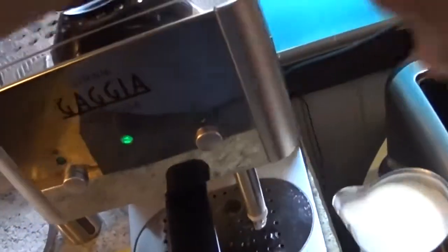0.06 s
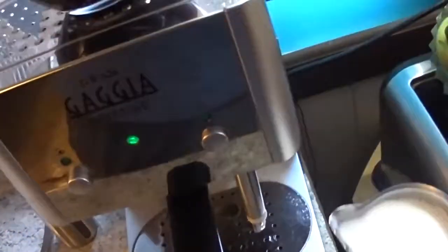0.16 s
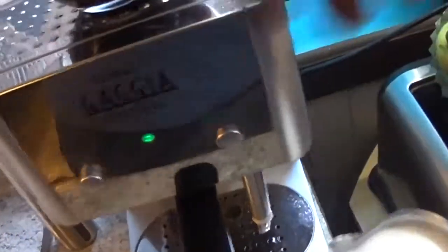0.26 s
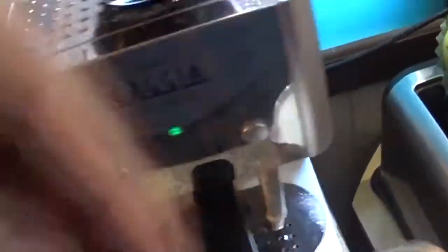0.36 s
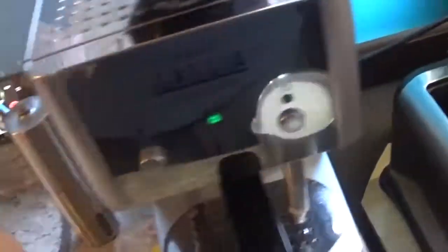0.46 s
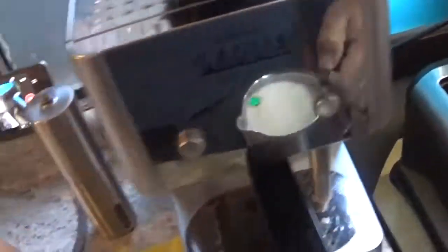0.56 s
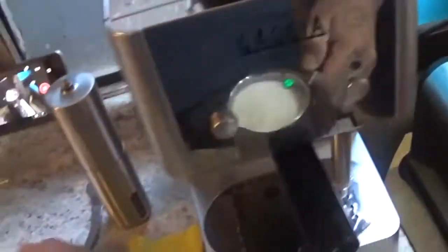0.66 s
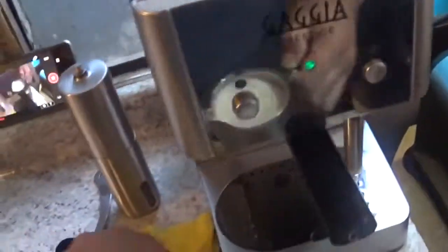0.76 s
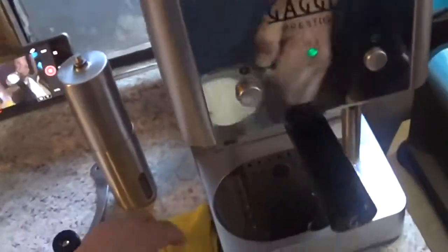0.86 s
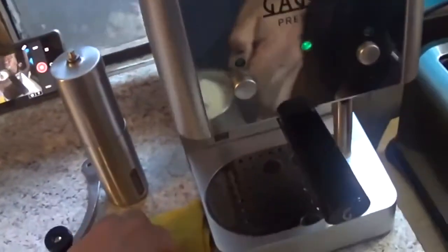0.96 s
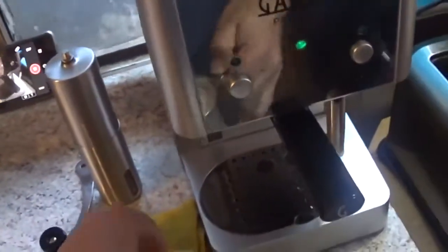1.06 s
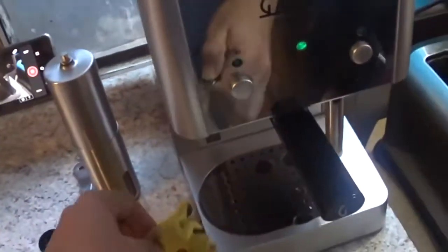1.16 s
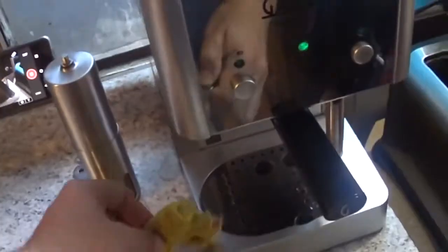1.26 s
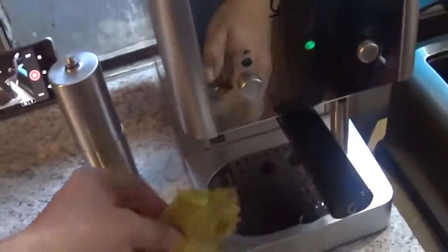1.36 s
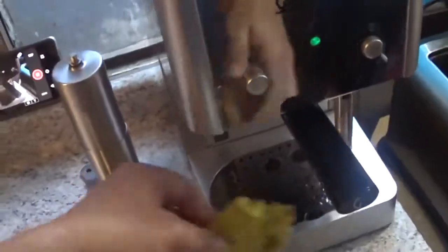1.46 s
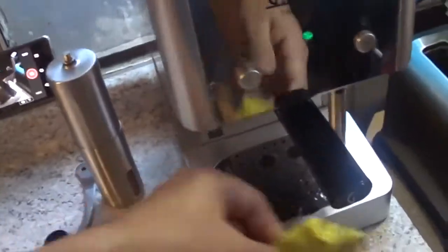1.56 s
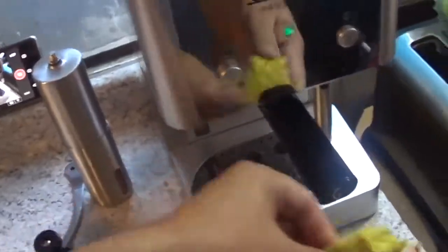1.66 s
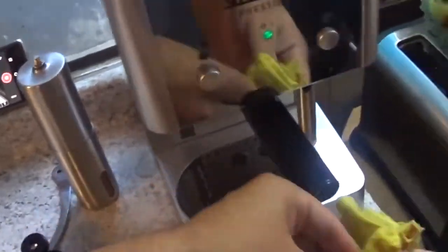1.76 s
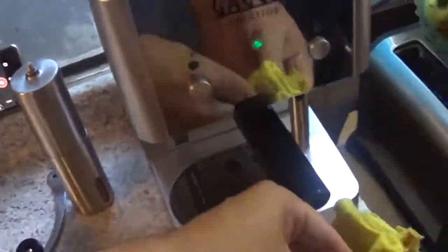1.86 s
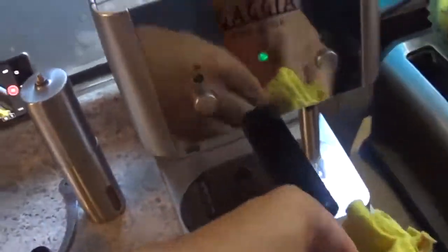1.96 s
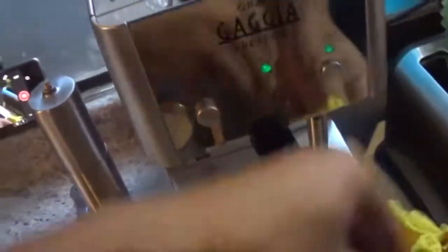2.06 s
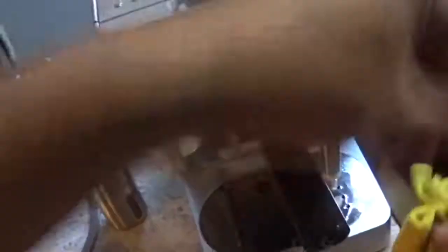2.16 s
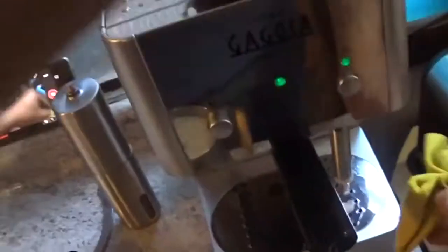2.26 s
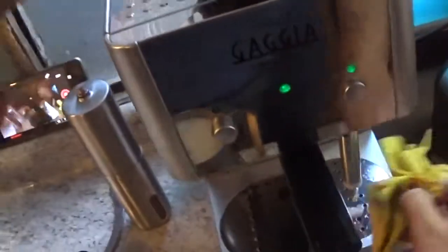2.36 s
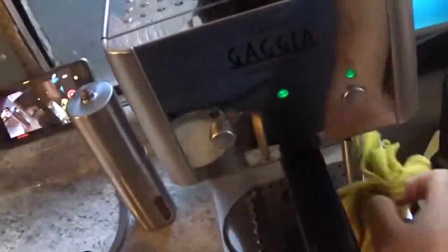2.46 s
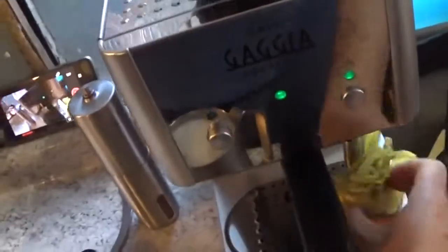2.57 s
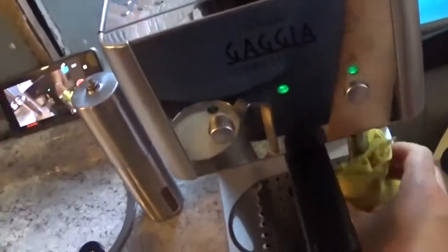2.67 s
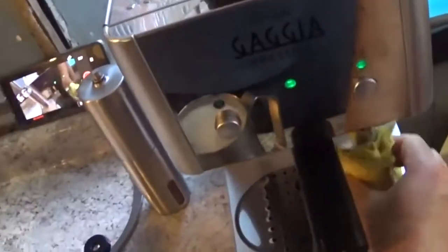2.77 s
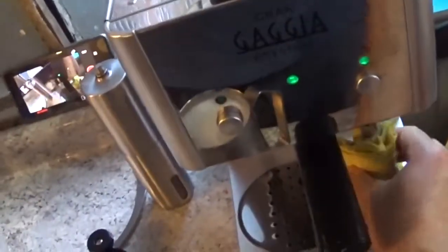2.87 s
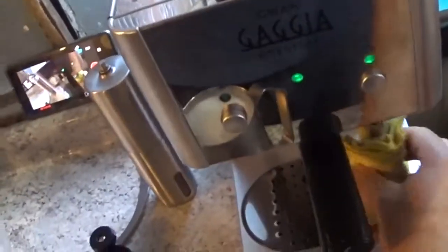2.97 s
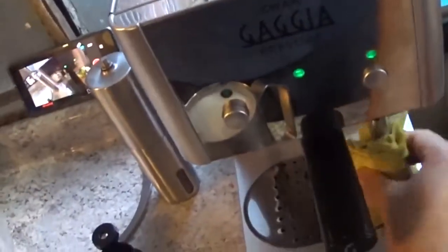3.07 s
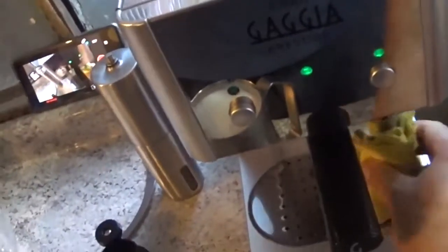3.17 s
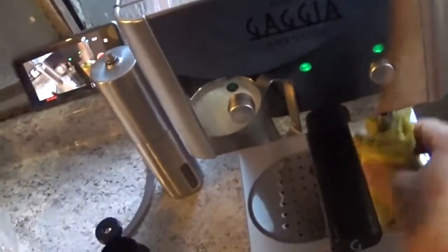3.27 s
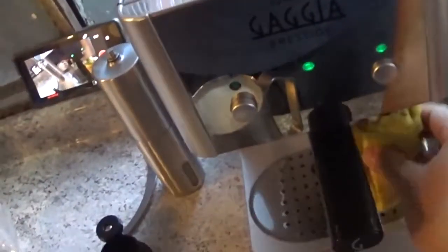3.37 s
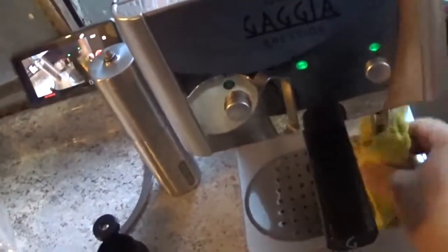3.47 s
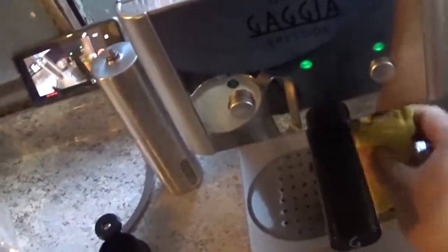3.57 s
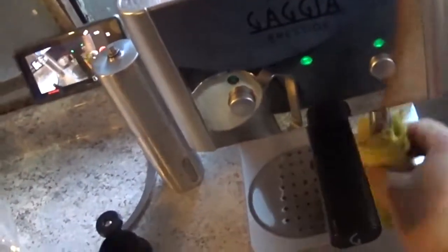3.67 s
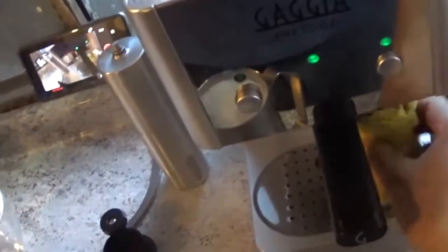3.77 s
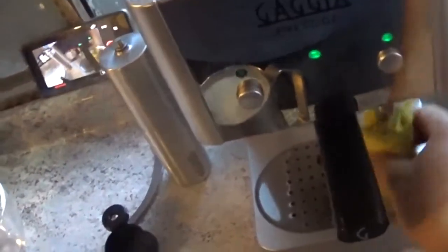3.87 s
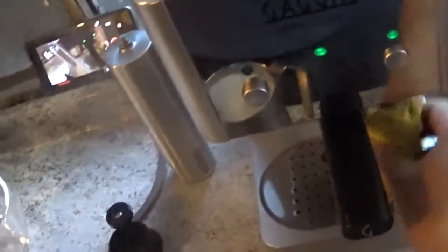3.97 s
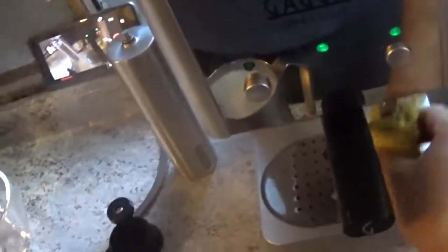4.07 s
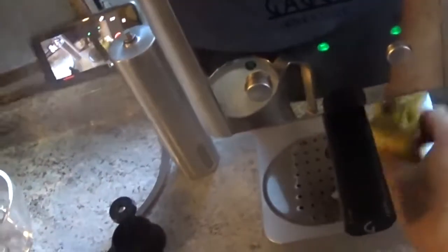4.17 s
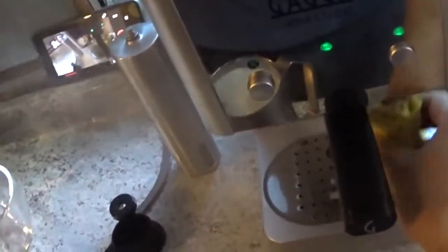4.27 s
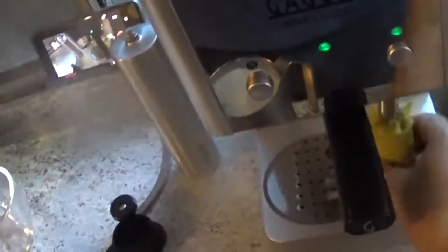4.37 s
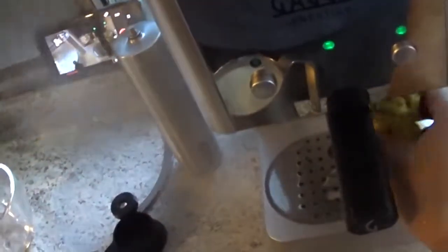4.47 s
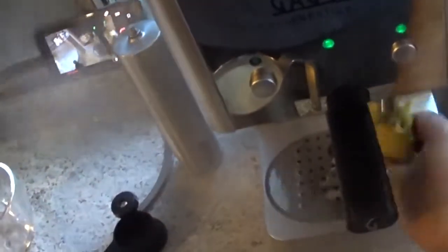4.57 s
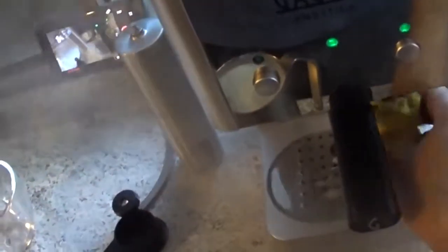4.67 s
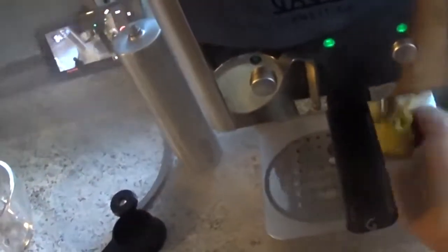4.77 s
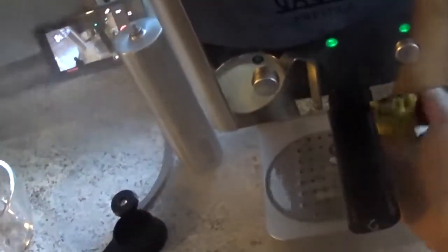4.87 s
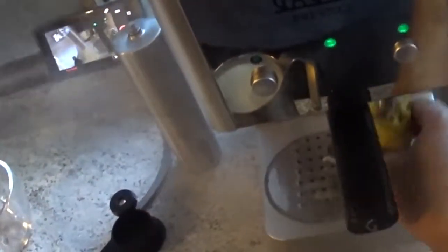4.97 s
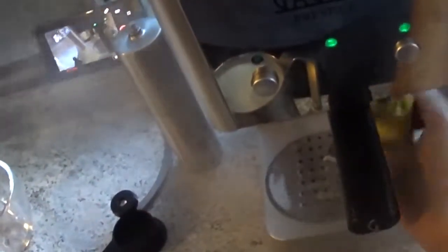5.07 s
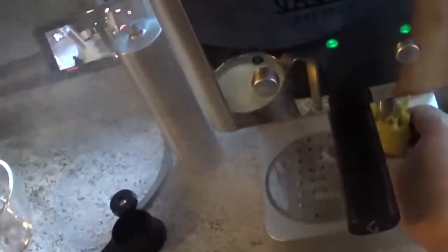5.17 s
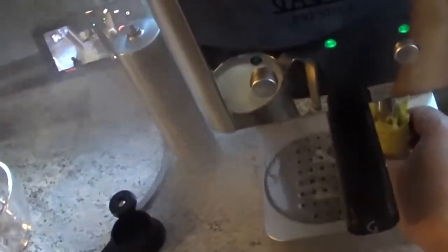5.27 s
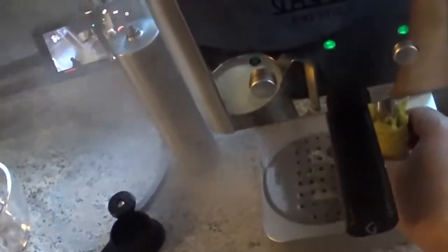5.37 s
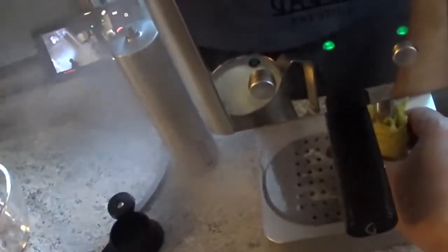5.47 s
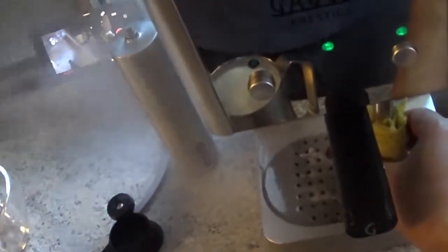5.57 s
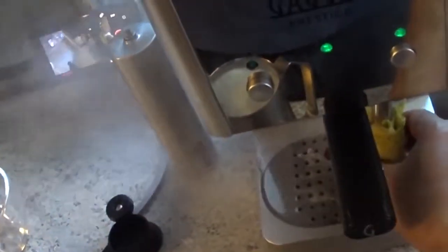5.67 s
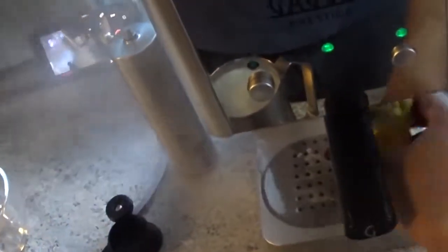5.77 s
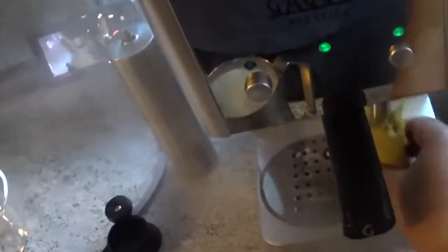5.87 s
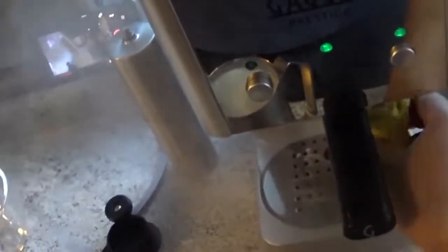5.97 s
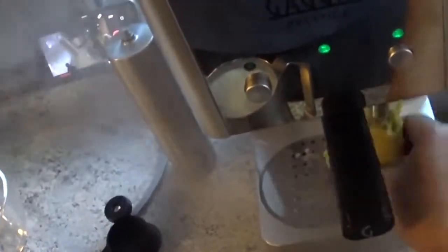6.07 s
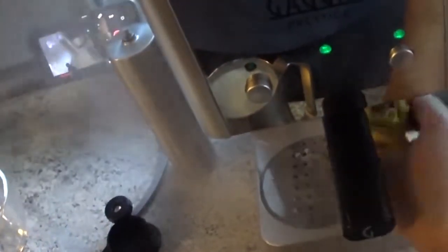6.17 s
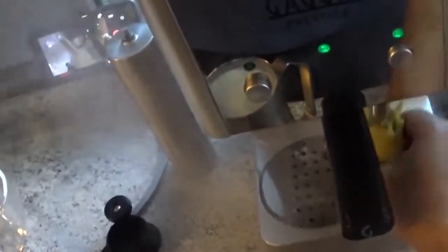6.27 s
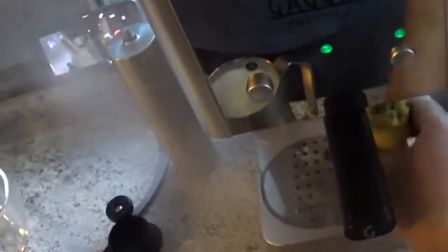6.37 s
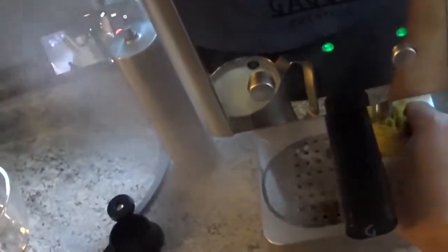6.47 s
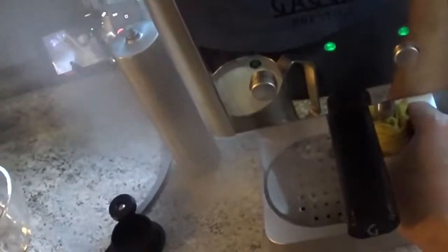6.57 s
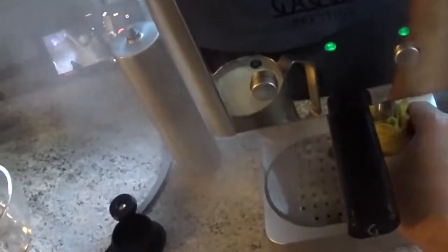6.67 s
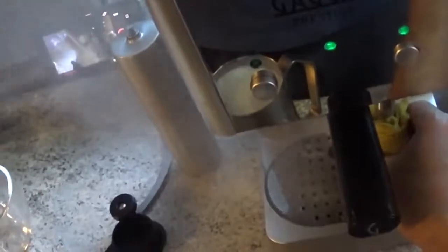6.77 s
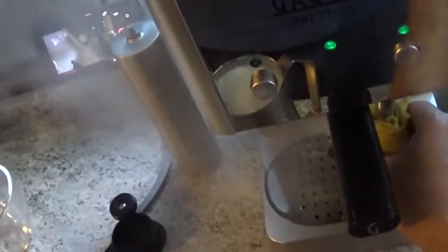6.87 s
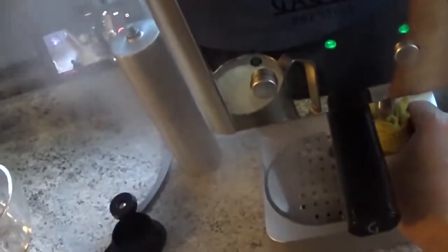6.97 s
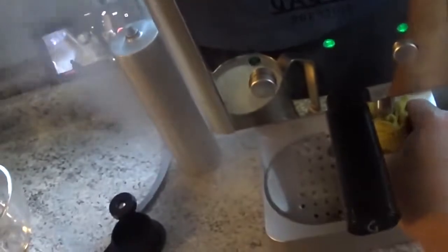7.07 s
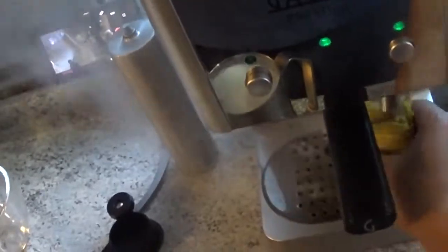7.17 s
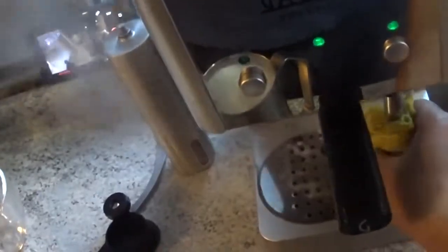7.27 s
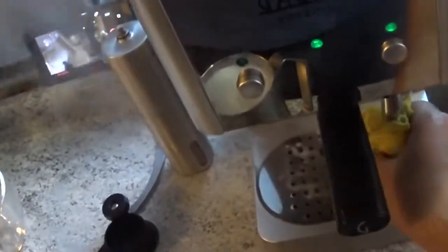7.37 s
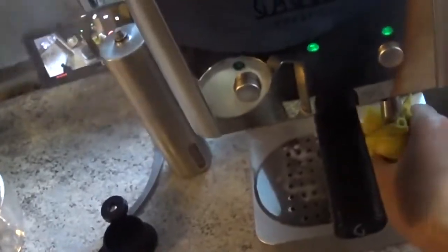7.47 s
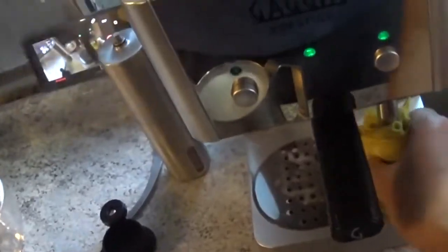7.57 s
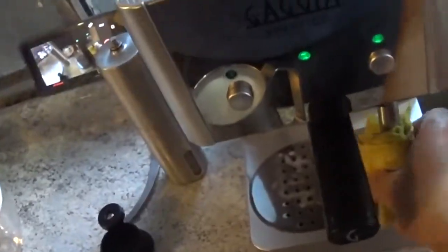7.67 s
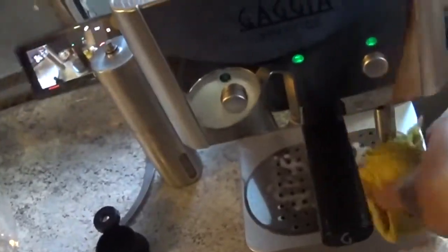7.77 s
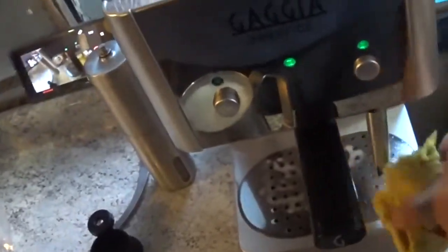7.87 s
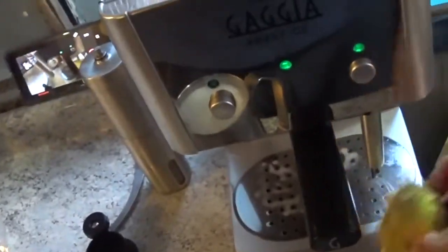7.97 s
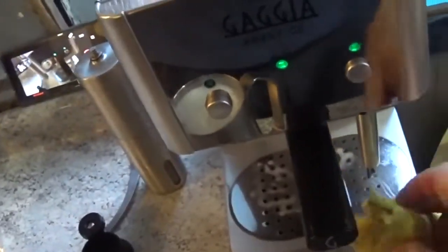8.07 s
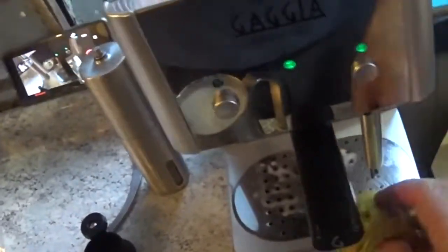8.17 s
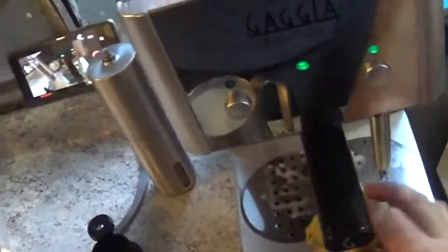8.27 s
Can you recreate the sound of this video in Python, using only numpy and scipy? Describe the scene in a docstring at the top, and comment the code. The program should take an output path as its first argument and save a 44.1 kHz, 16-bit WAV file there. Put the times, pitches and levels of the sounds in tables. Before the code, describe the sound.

A full metal milk pitcher knocks twice on a stone counter, then a steam wand blasts a loud fluttering hiss into cloth and cuts off.

```python
"""In a quiet kitchen a full milk pitcher is set down twice on a stone counter: short blows ring damped modes.
Then a hand purges a steam wand into a cloth: turbulent noise is filtered by resonances of cloth and housing.
The cloth slides up and down the wand, baring and muffling the jet; then the closed wand leaks and the cloth
squeaks. Hands rustle before and after, as patchy noise, with light ticks as bursts of band noise.
Behind lie still air, as steady noise, and a fridge hum of slightly wavering sines."""
import sys
import numpy as np
from scipy import signal
from scipy.fft import rfft, irfft
from scipy.io import wavfile
from scipy.ndimage import uniform_filter1d

SR = 44100
rng = np.random.default_rng(int(sys.argv[2]) if len(sys.argv) > 2 else 0)


def transcribe(u):
    """Save the signal u as a 16-bit wav file named by the first command-line argument.

    u: samples, shape (n,) or (channels, n), limited to [-1, 1]; the rate is SR.
    q: integer samples, one column per channel.
    """
    v = np.clip(np.atleast_2d(u).T, -1, 1)
    q = np.round(v * 32767).astype(np.int16)
    wavfile.write(sys.argv[1], SR, q)


N = 366912  # length in samples
HOP, WINDOW = 256, 1024  # samples
HZ = np.fft.rfftfreq(WINDOW, 1 / SR)[:, None]  # centre of each frequency bin
TIMES = np.arange(N // HOP + 2) * HOP / SR  # s, time of each frame

# Course of the jet. Each row: time in seconds, flow in dB re full, then the lifts in dB of the hollow tone
# near 2 kHz, of the core near 3 kHz and of the treble.
JET_COURSE = [(3.03, -54, 0, -1, -3), (3.07, -13.5, 0.5, 3, -13), (3.16, -11, -8.5, -5, -3.5),
              (3.23, -6, -1, -0.5, -2), (3.38, -5.5, -2.5, -4, 0), (3.42, 0.5, -2.5, 0, -2.5),
              (3.53, 0.5, 5, -1.5, 0.5), (3.565, 0, -4, -2, -2), (3.7, -0.5, 2.5, -2.5, -1),
              (3.8, -0.5, 3, -1.5, -1.5), (3.93, -1, 7, -0.5, 0), (3.98, 0, -2, -1.5, 1.5),
              (4.25, 0, -0.5, 0, 0.5), (4.42, -1, -0.5, 2, 1), (4.7, 0, 1, -1, 1),
              (4.92, -1, 0.5, 0.5, 0.5), (5.15, -0.5, 2, 0.5, 1), (5.28, -0.5, 1.5, 3, -2.5),
              (5.8, -0.5, 0, 2.5, -1.5), (6.3, -0.5, 0.5, 3, -1), (6.7, -1.5, -3, 1.5, -1.5),
              (7.15, -1, -4.5, 1, -2), (7.22, -3, -5, -0.5, -0.5), (7.28, -7, -4.5, -7, -0.5),
              (7.34, -27, -8, -16, -5), (7.48, -53, -4, -2, -3)]
# Borders in Hz between the six parts of the jet.
PART_EDGES = (300, 1500, 2500, 3900, 5800, 8800, 11100)
# Parts of the jet: roar, pocket, core, body, fizz, sizzle. Each row: level in dB at full flow, dB per dB of
# flow, share of the hollow lift, of the core lift and of the treble lift, dB when the tip is bared, share of
# the mid-stroke dip, share of the sizzle change.
JET_PARTS = [(-36, 0.74, 0.063, 0.048, 0.094, -1.5, 0.28, .02), (-28.5, 1.06, 1, 0.19, 0.11, -1, 1, .02),
             (-24.5, 1.03, .1, 1, -0.056, -0.4, .3, .02),
             (-28.5, 1.09, 0.078, -0.31, 0.00042, 0, 0.19, 0.12),
             (-30.5, 0.94, 0.061, -0.23, 0.29, 7.5, .02, .05), (-28.5, 1.08, .02, -.1, 1, 0.6, .02, 0.86)]
# Broad noise between the resonances. Each row: frequency in Hz, relative power per Hz in dB.
JET_FLOOR = [(71, -69.5), (120, -47.5), (381, -23), (507, -12), (686, -15), (845, -8), (1080, -7),
             (1310, -3.5), (2100, -18.5), (2840, -12.5), (7190, -15.5), (9560, -16), (11100, -21.5),
             (14500, -46.5), (22000, -120)]
# Resonances with the cloth cupped loosely, wrapped over the tip, and slid off the tip. Each row: frequency
# in Hz, width in Hz, relative level in dB.
CUPPED_MODES = [(850, 46, -10), (1460, 150, 2), (1880, 190, 4.5), (2260, 99, -1.5), (2776, 38, 1.5),
                (3087, 24, 2.5), (3720, 75, -4), (3820, 29, -5.5), (4420, 33, 3), (5325, 42, 0.5),
                (5670, 47, -9.5), (6260, 41, -8), (8000, 33, -12), (8230, 120, -5), (8750, 54, -30),
                (10100, 120, -5.5), (9480, 150, -7.5), (10150, 200, -4.5), (11000, 18, -22.5)]
WRAPPED_MODES = [(845, 18, 1.5), (1336, 110, -1), (1820, 95, -28), (2730, 1500, -18), (4100, 31, -4),
                 (4530, 200, -4.5), (5380, 150, -12.5), (5830, 420, -9.5), (6470, 200, -11),
                 (6800, 58, -43), (7140, 23, -15.5), (7690, 110, -4), (8220, 89, -7.5), (9650, 230, -4.5),
                 (10300, 46, -4.5), (10840, 62, -6.5)]
BARED_MODES = [(851, 80, -13), (1458, 203, -10), (1930, 240, -2.5), (3055, 490, -2.5), (4280, 350, -4.5),
               (5180, 280, -2.5), (6280, 600, -3.5), (7900, 380, 0.5), (8240, 330, -0.5), (9570, 360, -5.5),
               (10780, 430, -2)]
# Narrow peaks and dips from housing, tray and counter. Each row: frequency in Hz, width in Hz, gain in dB.
HOUSING_PEAKS = [(520, 71, 2.5), (839, 41, 7.5), (906, 58, -5), (1310, 35, 3), (1649, 74, -8.5),
                 (1840, 28, 3), (2150, 33, 3.5), (2120, 60, -7.5), (2263, 38.6, 13.5), (2330, 22, 0.5),
                 (2456, 90, 2.5), (2744, 45, 4.5), (2873, 75, 3), (3196, 140, 2.5), (3230, 90, -1),
                 (3433, 55, -1), (3970, 48, -3.5), (4225, 65, 3), (4680, 40, 2), (5010, 40, 4.5),
                 (5420, 49, 8), (5664, 46, 6), (6340, 86, 7), (8000, 40, 4.5), (8654, 40, -1),
                 (10950, 60, 3.5)]
# Stereo image of the jet. Each row: frequency in Hz, then likeness of the two channels (0-1), level
# difference left minus right in dB, or phase difference in radians.
JET_LIKENESS = [(60, 0.97), (130, 0.69), (260, 0.79), (550, 0.86), (1160, 0.98), (2430, 0.98), (5090, 0.9),
                (10700, 0.95)]
JET_LEVEL_DIFFERENCE = [(60, 0.0), (110, 0.0), (190, 0.0), (340, 0.0), (600, -0.5), (1070, -1.0),
                        (1900, -1.3), (3370, -0.38), (6000, -0.69), (10700, -0.5)]
JET_PHASE_DIFFERENCE = [(0, 0), (600, -0.25), (1380, -0.51), (1980, -0.73), (2500, 0.12), (3700, -0.068),
                        (6800, 0.032), (10900, 0.18)]


def steam():
    """Turbulent jet noise: broad noise through resonances that change as cloth grips, covers and bares the tip."""
    s, _, *lifts = np.transpose(JET_COURSE)
    flow_db = on_frames(JET_COURSE)[0]
    lifts_db = [np.interp(TIMES, s, lift) for lift in lifts]
    controls = np.array([flow_db, *lifts_db, *strokes()])
    bare = np.clip(controls[4], 0, 1)

    grip = np.interp(TIMES, (3.65, 4.1), (0, 1))  # s, the hand closes round the wand
    # the loose cloth keeps changing shape
    drift = 1 + 0.02 * evened(uniform_filter1d(rng.standard_normal(len(TIMES)), size=16))
    loose = resonances(CUPPED_MODES, drift)
    held = (1 - bare) * resonances(WRAPPED_MODES) + bare * resonances(BARED_MODES)

    ring_loss = 0.36  # dB per dB: resonances fade faster than the jet as the flow drops
    ringing = amp(2 * ring_loss * np.minimum(flow_db + 3, 0))
    power = ((1 - grip) * loose + grip * held) * ringing
    power += amp(2 * (read(JET_FLOOR) + 4.0))
    housing_db = sum(db / (1 + (2 * (HZ - f) / w) ** 2) for f, w, db in HOUSING_PEAKS)
    power *= amp(2 * np.sqrt(ringing) * housing_db)
    power /= 1 + (420 / (HZ + 1)) ** 6  # a small jet radiates no bass

    # each part is brought to the level that flow, lifts and strokes call for
    parts, edges = np.array(JET_PARTS), np.array(PART_EDGES)[:, None]
    wanted_db = parts[:, :1] + parts[:, 1:] @ controls
    inside = (HZ.T >= edges[:-1]) & (HZ.T < edges[1:])
    lift_db = wanted_db - 10 * np.log10(inside @ power / len(HZ))
    inside[0, :8] = inside[-1, -260:] = True  # the outer parts reach on to the ends of the spectrum
    blend = uniform_filter1d(1. * inside, size=13, axis=1)  # neighbouring parts merge softly

    combs_db = 2.34 * patches(1, 70)  # reflections shift slowly as the hand moves
    eddies_db = 1.11 * patches(9, 8)  # eddies drift
    droplets_db = 0.89 * patches(200, 2)  # droplets spit across wide bands
    gain = np.sqrt(power) * amp(blend.T @ lift_db + combs_db + eddies_db + droplets_db - 0.49)
    jet = noise(gain, read(JET_LIKENESS), read(JET_LEVEL_DIFFERENCE), read(JET_PHASE_DIFFERENCE))
    valve_db = np.interp(np.arange(N) / SR, (2.97, 3.068), (-24, 0))  # the valve cracks open
    return jet * amp(valve_db)


# The cloth slides off the tip and back. Each row: start in seconds, length in seconds, how far it goes (0-1),
# dip of the low parts in dB (negative lowers), change of the sizzle in dB.
CLOTH_STROKES = [(3.595, .11, 0.24, 1.5, 2.5), (3.773, .1, 0.43, 0.5, -0.5), (3.977, .13, 0.4, 0.5, -1),
                 (4.194, .12, 0.47, -2, 0.5), (4.376, 0.1, 0.53, -1, -1.5), (4.552, 0.11, 0.68, -5, 0.3),
                 (4.733, .125, 0.8, -6.5, -1), (4.923, .115, 0.78, -8, 0.4), (5.103, .115, 0.6, -5.5, -.4),
                 (5.853, 0.11, 0.67, -1, -0.5), (6.062, .105, 0.86, -6, -1), (6.245, .11, 0.64, -7, 0),
                 (6.425, 0.095, 0.8, -3, 0.2)]


def strokes():
    """Variable obstruction: how far the tip is free (0-1), mid-stroke dip and change of sizzle (dB)."""
    slide_s, dip_s, sizzle_lead_s = 0.017, 0.04, 0.014  # slide off or on, half width of dip, sizzle moves ahead
    s, length, far, dip_db, sizzle_db = np.transpose(CLOTH_STROKES)[:, :, None]

    def off(t):
        """Linear slide: 0 with the cloth on the tip, 1 with it off."""
        return np.clip(np.minimum(t - s, s + length - t) / slide_s + 0.5, 0, 1)

    dip = np.exp(-((TIMES - s - 0.5 * length) / dip_s) ** 2)
    free = (far * off(TIMES)).sum(0)
    sizzle = (sizzle_db * off(TIMES + sizzle_lead_s)).sum(0)
    return free, (dip_db * dip).sum(0), sizzle


# Modes of the pitcher on stone. Each row: frequency in Hz, relative level in dB landing flat, the same landing
# on the rim, undamped decay time t60 in seconds; levels are then weighted by 1 / sqrt(t60).
PITCHER_MODES = [(360, -7, -23, 0.14), (392, -4, -22, 0.19), (448, 5, 1, 0.15), (515, -1.5, 8, 0.099),
                 (652, 2, 0, 0.11), (737, 0, 6, 0.045), (850, -13, -2, 0.068), (917, -6, -12, 0.065),
                 (1003, -13, 0, 0.11), (1213, -12, -26, .09), (1470, -15, -16, 0.09),
                 (1570, -18, -27, 0.099), (1980, -21, -28, .08), (2180, -27, -25, .09),
                 (2410, -21, -28, 0.087), (2815, -29, -32, .08), (3850, -28, -40, .08)]
# Blows and their bounces. Each row: time in seconds, peak of the ring in dB, share on the rim (0-1), contact
# in ms, ring time as a factor at 600 Hz (the hand damps the low modes most).
PITCHER_BLOWS = [(1.0003, -19.5, 0.24, 0.29, 0.88), (1.0038, -16, 0, 0.36, 0.81),
                 (1.018, -21.5, 0, 1.06, 0.68), (1.107, -45, .3, .3, .9), (1.145, -43.5, 0, 1.7, .6),
                 (1.3942, -24, 1, 0.19, 0.55), (1.3984, -17.5, 0.7, 0.34, 0.27),
                 (1.4073, -29, .98, 0.26, 0.65), (1.422, -42, .5, 1.3, .4), (1.8039, -42.5, 0, 2.7, 1),
                 (1.826, -45, 0.1, 2.9, 0.51)]


def pitcher():
    """Modal impact: a short push rings the damped modes of the milk-filled pitcher and thumps the counter."""
    slab_hz, slab_db, slab_t60 = 183, -22, 0.09  # Hz; dB re a flat blow; s
    out, t = np.zeros(N), np.arange(SR // 3) / SR
    for s, peak_db, rim, contact_ms, free in PITCHER_BLOWS:
        ring = 0
        for hz, flat_db, rim_db, t60 in PITCHER_MODES:
            fade_db = -60 * t / t60 / free ** (600 / hz)
            level_db = flat_db + rim * (rim_db - flat_db)
            ring = ring + amp(level_db + fade_db) * np.sin(2 * np.pi * hz * t) / np.sqrt(t60)
        push = np.hanning(int(abs(contact_ms) * SR / 1000) + 3)  # longer contact, duller ring
        ring = np.convolve(ring, push)
        ring = signal.lfilter(*signal.butter(5, 350, 'high', fs=SR), ring)  # a small vessel radiates no bass
        add(out, s, -amp(peak_db) * ring / abs(ring).max())

        thump_db = peak_db + slab_db - 6.8 * rim - 60 * t / slab_t60  # a rim landing thumps less
        onset = 1 - np.exp(-t / 0.0054)
        add(out, s, amp(thump_db) * onset * np.sin(2 * np.pi * slab_hz * t))
    return out


# The wand after closing. Leak, each row: time in seconds, level in dB. Drag of the cloth, each row: start in
# seconds, length in seconds, level in dB. Bands of either, each row: centre in Hz, width in Hz, relative dB.
LEAK_COURSE = [(7.29, -50), (7.33, -55), (7.46, -63), (7.56, -66), (7.83, -65), (7.85, -78)]
LEAK_MODES = [(3120, 270, 0), (4430, 200, -7), (4980, 110, 3), (5400, 160, -5.5), (6000, 400, -10)]
CLOTH_DRAG = [(7.845, .06, -62), (7.878, .03, -57), (7.9, .09, -63), (7.94, 0.048, -58), (7.98, 0.082, -70)]
DRAG_MODES = [(4040, 350, -11), (4700, 200, -7), (5200, 80, 2), (5680, 200, -14), (7900, 200, -2.5),
              (9300, 300, -8)]


def after_steam():
    """Resonance-filtered noise: the closed wand leaks in thin bands; the cloth squeaks as it is pulled off."""
    leak = evened(np.sqrt(resonances(LEAK_MODES))) * amp(on_frames(LEAK_COURSE)[0])
    above_khz = np.maximum(HZ / 1000 - 3.3, 0)
    leak *= amp(-30 * above_khz * np.maximum(TIMES - 7.45, 0))  # the upper bands fade first
    drag = evened(np.sqrt(resonances(DRAG_MODES))) * swells(CLOTH_DRAG)
    return noise(np.hypot(leak, drag) * amp(1.5 * patches(6, 4)), 0.85)


# Light ticks, scuffs and the first puff of the valve. Each row: time in seconds, level in dB before a common
# trim, centre in Hz, width in Hz, t60 in seconds.
LIGHT_TICKS = [(.1331, -59, 1500, 2500, .05), (.4115, -58, 1500, 2500, .06), (.87, -58, 2500, 4000, .1),
               (1.0007, -50, 3500, 6000, 0.23), (1.1, -52, 2500, 4000, 0.1),
               (1.394, -49.5, 3000, 5000, .08), (1.471, -55.5, 6500, 6000, 0.084),
               (1.596, -49, 1990, 2960, 0.13), (1.5, -63, 9100, 600, 0.092), (1.6, -60, 3800, 500, 0.13),
               (1.875, -55, 2500, 5000, 0.16), (3.066, -37, 845, 870, 0.21),
               (1.678, -53, 5770, 2500, 0.027), (1.8043, -47, 2000, 3500, 0.046),
               (2.1705, -43, 6960, 7000, 0.052), (2.2104, -47, 1280, 1800, 0.21),
               (2.852, -66, 2500, 4000, .1), (7.7202, -46.5, 1820, 2500, .05),
               (7.8853, -48, 5150, 500, .06)]


def ticks():
    """Band-limited transients: short bursts of noise round a centre pitch that die exponentially."""
    out, t = np.zeros(N), np.arange(SR // 5) / SR
    bursts, bins = rng.standard_normal((len(LIGHT_TICKS), len(t))), np.fft.rfftfreq(len(t), 1 / SR)
    for (s, level_db, hz, width, t60), burst in zip(LIGHT_TICKS, bursts):
        band_gain = 1 / (1 + (2 * (bins - hz) / width) ** 4)
        band = evened(irfft(rfft(burst) * band_gain, len(t)))
        attack = np.minimum(t / 0.00047, 1)
        add(out, s, amp(level_db - 3.5 - 60 * t / t60) * band * attack)
    return out


# Rustles. Each row: start in seconds, length in seconds, level in dB of the low and of the high band,
# before the uneven patches.
HAND_RUSTLES = [(.0, 0.041, -65, -81), (.13, 0.15, -62, -72), (.27, 0.081, -64, -71), (.41, .07, -64, -77),
                (.85, 0.11, -65, -67), (1.14, 0.087, -62.5, -70), (1.28, 0.19, -66, -68),
                (1.59, 0.29, -62.5, -70), (1.68, 0.11, -61, -67), (1.84, 0.13, -59.5, -65),
                (1.99, 0.32, -59.5, -72), (2.2, 0.56, -58.5, -69.5), (2.67, .1, -64, -68),
                (2.46, .12, -62, -72), (2.85, .1, -59.5, -66.5), (7.4, 0.23, -72, -68),
                (7.55, .3, -72, -70), (7.7, .05, -60, -69.5), (7.84, 0.16, -64, -64),
                (7.98, 0.17, -67, -71)]
# Spectra of the low and the high band. Each row: frequency in Hz, relative level per Hz in dB.
LOW_SPECTRUM = [(180, -33.5), (300, -12.5), (442, 2.5), (502, 5), (569, -23), (704, -3), (871, -1),
                (6000, -26.5), (7800, -50), (13200, -120)]
HIGH_SPECTRUM = [(1180, -9), (2000, -1.5), (3530, -8), (4100, -13.5), (4840, -9), (6310, -12.5),
                 (10600, -25), (11100, -22), (14500, -55.5), (22000, -120)]


def hands():
    """Friction noise: cloth and skin rustle in uneven patches, with faint stirring between."""
    stirring_db = np.array([[-72.5], [-81.5]])  # low band, high band
    low_level, high_level = np.hypot(swells(HAND_RUSTLES), amp(stirring_db))
    low = evened(amp(read(LOW_SPECTRUM))) * low_level
    high = evened(amp(read(HIGH_SPECTRUM))) * high_level
    uneven_db = 3.3 * patches(12, 6) + 0.96 * patches(120, 3)
    return noise(np.hypot(low, high) * amp(uneven_db), 0.73)


# Still air. Each row: frequency in Hz, then relative level per Hz in dB, or likeness of the channels (0-1).
AIR_SPECTRUM = [(18, -49), (30, -27.5), (65, -30), (87, -15), (109, -1), (120, -15.5), (178, -13.5),
                (384, -5.5), (414, -12), (570, -6), (869, -14), (1010, -12.5), (1260, -18), (2340, -22),
                (11100, -34.5), (14500, -70.5), (22000, -120)]
AIR_LIKENESS = [(60, 0.79), (170, 0.95), (480, 0.87), (1340, 0.28), (3790, 0.39), (10700, 0.52)]
# Fridge partials, before the waver. Each row: frequency in Hz, rms level in dB.
FRIDGE_HUM = [(48, -85), (96, -69), (190, -73), (240, -80.5), (290, -80.5)]


def room_tone():
    """Stationary noise plus harmonic hum: still air and the slightly wavering hum of a fridge."""
    air_db = -59 + 0.72 * patches(10, 12)
    air = noise(evened(amp(read(AIR_SPECTRUM))) * amp(air_db), read(AIR_LIKENESS))
    t = np.arange(N) / SR
    pitch_waver, level_waver = evened(uniform_filter1d(rng.standard_normal((2, N)), size=6000, axis=1))
    warped_s = np.cumsum(1 + 0.004 * pitch_waver) / SR
    hum = np.zeros_like(t)
    for hz, db in FRIDGE_HUM:
        hum += np.sqrt(2) * amp(db) * np.sin(2 * np.pi * hz * warped_s)
    return air + amp(0.8 * level_waver) * hum


# Decay of the room. Each row: frequency in Hz, t60 in seconds.
KITCHEN_DECAY = [(200, 0.13), (1000, 0.21), (4000, 0.18), (10000, 0.14)]


def kitchen(x):
    """Reverberation by convolution: sparse echoes of random sign, each band dying at its own speed."""
    taps, first, spacing = np.zeros((2, SR // 2)), 300, 20  # samples
    at = np.arange(first, SR // 2 - spacing, spacing)
    at = at + rng.integers(0, spacing, (2, len(at)))
    np.put_along_axis(taps, at, rng.choice([-1., 1.], at.shape), 1)
    taps[1] = 0.65 * taps[0] + 0.53 * taps[1]  # the channels are partly alike
    t, z = signal.stft(taps, SR, nperseg=1024, noverlap=896)[1:]
    tail = signal.istft(z * amp(-60 * t / read(KITCHEN_DECAY)), SR, nperseg=1024, noverlap=896)[1]
    tail[:, :first] = 0  # nothing before the first echo
    return signal.fftconvolve(x[None], tail / np.linalg.norm(tail[0]), axes=1)[:, :N]


def amp(db):
    """Decibel law: level in dB to gain."""
    return 10 ** (np.asarray(db) / 20)


def evened(x):
    """Normalisation: scales to rms 1."""
    return x / np.sqrt(np.mean(x ** 2) + 1e-20)


def read(points):
    """Interpolation: a spectrum on the bins, straight on a log frequency axis."""
    f, value = np.transpose(points)
    return np.interp(np.log(HZ + 1), np.log(f + 1), value)


def on_frames(rows):
    """Interpolation: the columns of a dB curve at frame times, silent outside it."""
    s, *columns = np.transpose(rows)
    return [np.interp(TIMES, s, c, left=-150, right=-150) for c in columns]


def swells(rows):
    """Energy summation: gains of events that swell early and fade over their length, one per level column."""
    loudest_at = 0.22  # place in the length
    s, length, *levels_db = np.transpose(rows)
    u = np.clip((TIMES - s[:, None]) / length[:, None], 0, 1)
    shape = np.sin(np.pi * u ** (np.log(0.5) / np.log(loudest_at)))
    return np.sqrt(amp(2 * np.array(levels_db)) @ shape ** 2)


def add(mix, s, sound):
    """Superposition: mixes a sound in at a time."""
    part = mix[round(s * SR):][:len(sound)]
    part += sound[:len(part)]


def patches(bins, frames):
    """Smoothed randomness: a field of rms 1 over frequency and time."""
    field = rng.standard_normal((len(TIMES), len(HZ))).T
    return evened(uniform_filter1d(uniform_filter1d(field, bins, 0), frames, 1))


def resonances(modes, drift=1):
    """Resonance curves: summed power of a set of modes, all shifted by a drifting factor."""
    return sum(amp(2 * db) / (1 + (2 * (HZ / drift - f) / w) ** 2) for f, w, db in modes)


def noise(gain, likeness, difference_db=0, phase=0):
    """Partial coherence: two partly alike noises, shaped by a gain over frequency and time."""
    a, b = signal.stft(rng.standard_normal((2, N)), nperseg=WINDOW, noverlap=WINDOW - HOP)[2]
    likeness = np.clip(likeness, -1, 1)
    side = amp(difference_db / 2) * np.exp(0.5j * phase)  # half the difference to each channel
    right = likeness * a + np.sqrt(1 - likeness ** 2) * b
    z = np.array([a * side, right / side])
    return signal.istft(z * gain[:, :z.shape[2]], nperseg=WINDOW, noverlap=WINDOW - HOP)[1][:, :N]


def scene():
    """Superposition of all sources; knocks, ticks and jet also ring in the kitchen."""
    near, jet = pitcher() + ticks(), steam()
    direct = near * amp([[0.3], [-0.3]])  # dB left, right
    echoes = kitchen(amp(-7.5) * near + amp(-11.5) * jet.mean(0))
    return direct + echoes + jet + after_steam() + hands() + room_tone()


def record(dry):
    """Linear-phase low-pass filtering: a steep band limit at 11060 Hz."""
    low_pass = signal.firwin(1535, 11060, window=("kaiser", 9), fs=SR)
    return signal.oaconvolve(dry, low_pass[None], "same")


dry = scene()
out = record(dry)
transcribe(out)
```